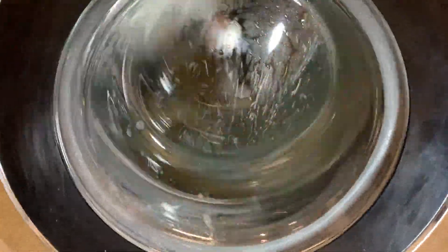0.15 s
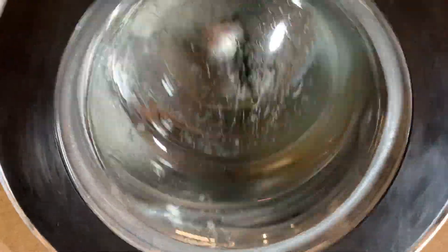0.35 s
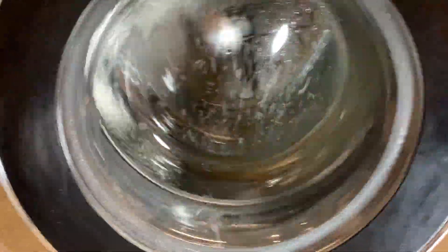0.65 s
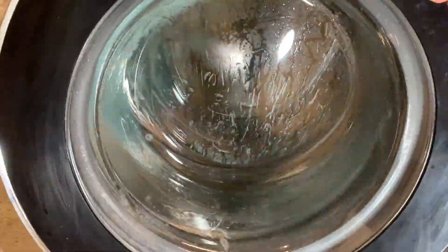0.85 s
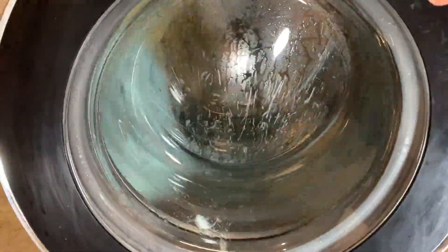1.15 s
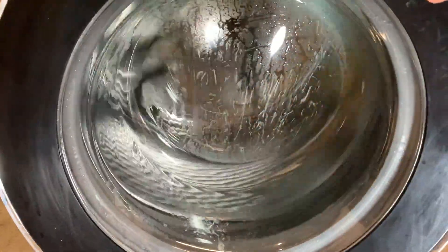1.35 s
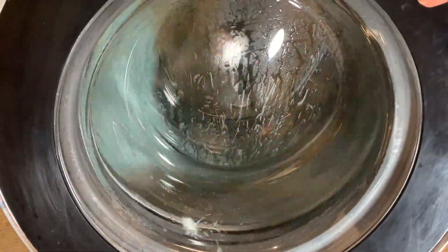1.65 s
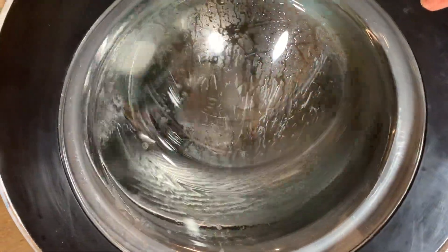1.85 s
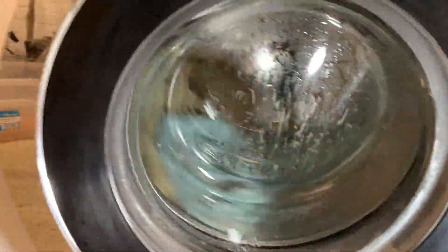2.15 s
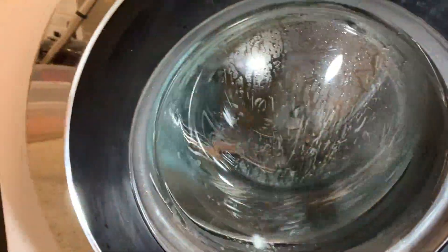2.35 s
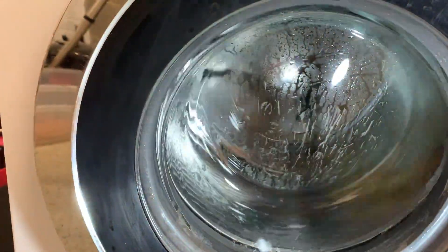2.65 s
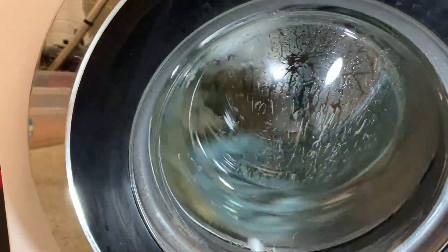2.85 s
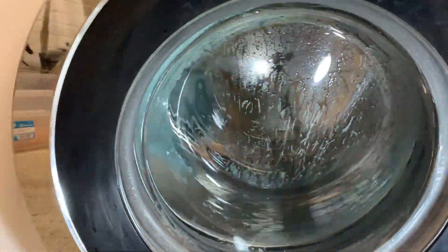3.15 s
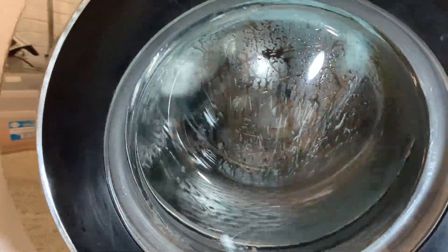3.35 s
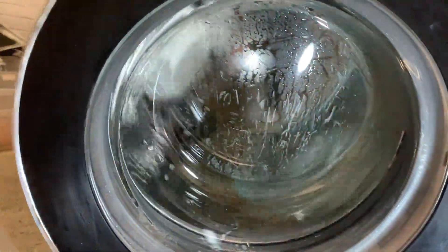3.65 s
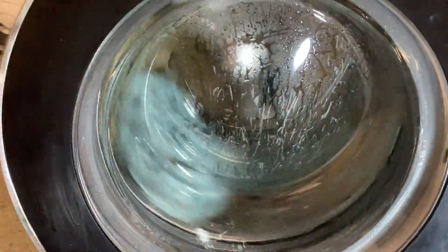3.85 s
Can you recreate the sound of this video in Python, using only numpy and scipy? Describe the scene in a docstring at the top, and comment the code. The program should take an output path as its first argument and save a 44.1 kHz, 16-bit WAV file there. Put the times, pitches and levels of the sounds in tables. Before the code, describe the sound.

Unbalanced washing machine drum bangs and clatters hard, then weakens to faint thuds as the spin dies

```python
"""Heavy knocks and clatter of an unbalanced washing machine drum against its cabinet, heard close in stereo.
Each blow starts banded noise (sheet metal) and rings decaying sines (panel modes); some modes clank out.
Lumpy low noise is the cabinet rumbling on the floor; all of it weakens as the spin winds down
into a quiet room of shaped noise and wavering hum."""
import sys
import numpy as np
from scipy import signal
from scipy.fft import rfft, irfft
from scipy.io import wavfile
from scipy.ndimage import uniform_filter1d

SR = 44100
rng = np.random.default_rng(int(sys.argv[2]) if len(sys.argv) > 2 else 0)


def generate_wav(sig):
    """Save sig (samples, or channels by samples) to the path in sys.argv[1] as 16-bit PCM at SR."""
    pcm = np.round(np.clip(np.atleast_2d(sig).T, -1, 1) * 32767).astype(np.int16)
    wavfile.write(sys.argv[1], SR, pcm)


N = 176400
HZ = np.fft.rfftfreq(N, 1 / SR)

# drum blows: start_s, treble_db, upper_middle_db, middle_db, hollow_db, thud_db (relative levels),
# length_factor (scales the clatter decay, limited on use)
BLOWS = [(0.0024, -42.5, -32, -23, -27, -6.5, 1.14), (0.0255, -15.5, -29.5, -10.5, -15.5, -16.5, 0.4),
         (0.0612, -23, -25.5, -20, -32.5, -22.5, 0.75), (0.1425, -30.5, -37, -21, -26, -11.5, 2.5),
         (0.11, -42.5, -33.5, -30, -22.5, -15, 2.4), (0.2292, -13.5, -22, -12, -16, -11, 1.1),
         (0.2595, -33, -23, -15, -7.5, -8, 1.2), (0.322, -23, -25, -30, -20, -8, 1.56),
         (0.3789, -30.5, -34.5, -28.5, -13, -8.5, 0.86), (0.406, -41, -34, -18, -26, -7.5, 0.78),
         (0.4523, -12, -20, -11.5, -10.5, -12, 0.9), (0.4837, -21, -19, -15, -7, -8, 1.3),
         (0.5484, -18.5, -18, -14.5, -12.5, -10, 1.7), (0.5773, -17, -25.5, -25, -16.5, -13, 1.25),
         (0.6552, -53, -30.5, -27, -10.5, -8.5, 1.4), (0.689, -59, -55.5, -11.5, -17, -20.5, 2.9),
         (0.7036, -17, -21.5, -14, -22, -9, 1.74), (0.7502, -32, -24, -23.5, -16.5, -8.5, 3.2),
         (0.821, -17, -21, -18.5, -11.5, -7.5, 1.3), (0.8597, -30, -46.5, -33, -11.5, -10, 0.47),
         (0.92, -47.5, -45, -30, -25.5, -22.5, 1.9), (0.982, -40.5, -37, -14.5, -22, -4.5, 0.31),
         (1.0034, -12.5, -20.5, -11.5, -13, -13.5, 0.55), (1.0423, -26, -25.5, -15, -6, -11.5, 0.64),
         (1.0643, -23.5, -21, -15, -11, -10, 1.64), (1.1089, -20.5, -22, -17.5, -15.5, -9.5, 1.17),
         (1.238, -35.5, -58, -49, -33, -17.5, 1.1), (1.2772, -37.5, -42, -26.5, -26, -8.5, 0.61),
         (1.3096, -38.5, -38.5, -24, -32, -16.5, 0.54), (1.3289, -52, -30, -29, -18.5, -25, 1.03),
         (1.395, -33.5, -31.5, -24.5, -22.5, -14.5, 2.5), (1.421, -25.5, -23.5, -16, -15, -15.5, 1.01),
         (1.613, -45, -46, -41.5, -34, -28, 2.2), (1.6417, -25.5, -41.5, -41, -24, -19.5, 1.1),
         (1.6605, -32.5, -31.5, -34, -34, -18.5, 1.25), (1.7598, -41, -55, -36, -50, -50, 0.61),
         (1.8326, -34, -44, -38, -34, -24.5, 0.91), (1.860, -27.5, -26.5, -20, -14.5, -11.5, 1.07),
         (1.8976, -31, -27.5, -39, -10, -28.5, 0.56), (1.9329, -32.5, -39, -38, -21.5, -30.5, 0.49),
         (1.9687, -45, -42, -38, -27, -18, 1.24), (2.0654, -47.5, -39, -45.5, -38, -27, 1.6),
         (2.1019, -32.5, -40, -37, -28.5, -23.5, 1.2), (2.1448, -44, -34.5, -30.5, -21.5, -22, 1.41),
         (2.2764, -41.5, -44, -41, -24, -21, 0.47), (2.299, -51, -47, -36.5, -36.5, -23.5, 1.67),
         (2.36, -34, -41.5, -50, -57, -51, 0.7), (2.4615, -43.5, -41, -37, -40, -29.5, 3.1),
         (2.5168, -51, -53, -38.5, -35, -32, 0.6), (2.5431, -31, -35, -34.5, -27.5, -36, 0.85),
         (2.589, -73, -50, -44.5, -31, -36.5, 1.53), (2.8101, -75, -106, -59.5, -50, -55, 0.74),
         (2.908, -58, -48, -46.5, -44, -39, 1.14), (3.046, -78.5, -55.5, -45, -39, -31.5, 1.08),
         (3.116, -83, -60, -56, -48, -47, 0.5), (3.292, -78.5, -57.5, -43.5, -39, -33.5, 1.02),
         (3.352, -75, -74, -54.5, -40, -39, 1.57), (3.701, -75, -71, -55, -62, -45, 0.54)]
# likeness of the two ports: freq_hz, likeness (0..1)
PORT_LIKENESS = [(60, 0.98), (290, 0.96), (640, 0.23), (1400, 0.091), (3100, 0.13), (6500, 0.27), (9000, 1),
                 (15000, 0.48)]


def amp(db):
    """Amplitude ratio of a level in dB."""
    return 10 ** (np.asarray(db) / 20)


def evened(x):
    """Signal scaled to unit RMS over all its channels."""
    return x / np.sqrt(np.mean(x ** 2) + 1e-20)


def read(points, hz, axis=1):
    """One table column interpolated over log frequency."""
    table = np.array(points)
    return np.interp(np.log(hz + 1), np.log(table[:, 0] + 1), table[:, axis])


def port_likeness(hz):
    """Share of sound common to both ports at a frequency."""
    return np.clip(read(PORT_LIKENESS, hz), 0, 1)


def port_phase(hz):
    """Phase in radians between the ports whose cosine is their likeness."""
    return np.arccos(port_likeness(hz))


def noise(tone):
    """Spectra of shaped noise at two partly alike ports; the left hears the treble later."""
    lag_s, lag_from_hz = 0.000191, 625
    a, b = rfft(rng.standard_normal((2, N)))
    alike = port_likeness(HZ)
    late = np.exp(-2j * np.pi * np.maximum(HZ - lag_from_hz, 0) * lag_s)
    left = a * late
    right = alike * a + np.sqrt(1 - alike ** 2) * b
    return amp(read(tone, HZ)) * np.array([left, right])


def wobble(seconds):
    """Random curve of unit RMS, smoothed twice over the given time."""
    size = max(int(seconds * SR), 2)
    once = uniform_filter1d(rng.standard_normal(N), size)
    return evened(uniform_filter1d(once, size))


def ring(hz, db, t60_s, phase):
    """One mode: a sine that swells over two cycles and decays exponentially."""
    t = np.arange(SR // 2) / SR
    envelope = amp(db - 60 * t / t60_s) * np.minimum(t * hz / 2, 1)
    return envelope * np.sin(2 * np.pi * hz * t + phase)


def hums(table):
    """Wavering tones: noise through narrow resonances, independent of port."""
    total = np.zeros(N)
    for hz, width_hz, db in table:
        resonance = 1 + (2 * (HZ - hz) / width_hz) ** 2
        tone = irfft(rfft(rng.standard_normal(N)) / resonance, N)
        total += amp(db) * evened(tone)
    return total


def blow_db(row, hz):
    """Level of one blow at a frequency, read between its five bands."""
    # centres of the blow columns, treble to thud: freq_hz
    column_hz = [8000, 3000, 900, 290, 90]
    return np.interp(np.log(hz), np.log(column_hz[::-1]), row[5:0:-1])


def blow_shape(row, hz, onset, rise_s, t60_s, t):
    """Amplitude of one blow in one band: a crack, a linear rise and an ever faster fall."""
    dull_from_db, soften_per_db = 24.5, 0.16
    bend = 1.073  # above 1: the fall steepens
    # dull blows, whose treble lies far below their middle, swell in more slowly
    softness = 1 + soften_per_db * max(row[3] - row[1] - dull_from_db, 0)
    rise = np.minimum(t / (rise_s * softness), 1)
    length_s = t60_s * np.clip(row[6], .2, 1.9)
    return onset * rise * amp(blow_db(row, hz) - 60 * (t / length_s) ** bend)


def clatter():
    """Sheet metal: each blow excites noise in 28 bands, each with its own rise and decay."""
    # band response: freq_hz, rise_s, t60_s
    ringing = [(51.26, 0.014, .5), (150, 0.0059, 0.4), (374.7, 0.011, 0.23), (1490, 0.0058, 0.29),
               (4650, 0.0028, 0.34), (13700, .001, 0.19)]
    # blow to band level: freq_hz, relative_db
    trim = [(60, -2), (150, 1), (350, -3), (1000, -0.5), (2500, -2), (5000, -9), (9000, -7.5),
            (15000, -6.5)]
    crack_db, crack_s = 9, 0.0023  # brighter first instant
    patch_db, patch_s = 3, 0.022  # each band flickers by itself
    ripple_db, ripple_hz = 1, 27.27  # countless small plate modes comb the spectrum
    ripple = wobble(ripple_hz * N / SR ** 2)[:len(HZ)]  # smoothed over frequency bins
    spectrum = noise(trim) * amp(ripple_db * ripple)
    t = np.arange(SR // 2) / SR
    centres_hz = np.geomspace(45, 15000, num=28)
    out = np.zeros((2, N))
    for k, hz in enumerate(centres_hz):
        share = np.interp(np.log(HZ + 1), np.log(centres_hz), np.arange(len(centres_hz)) == k)
        treble_weight = np.sqrt(k / len(centres_hz))
        onset = amp(crack_db * treble_weight * np.exp(-t / crack_s))
        rise_s, t60_s = read(ringing, hz), read(ringing, hz, axis=2)
        power = np.zeros(N)
        for row in BLOWS:
            shape = blow_shape(row, hz, onset, rise_s, t60_s, t)
            part = power[round(row[0] * SR):][:len(t)]
            part += shape[:len(part)] ** 2
        band = evened(irfft(spectrum * share, N))
        level_db = read(trim, hz) - 11.0 + patch_db * treble_weight * wobble(patch_s)
        out += band * np.sqrt(power) * amp(level_db)
    return out


def panels():
    """Each blow and its two bounces land elsewhere and ring the panel modes by different amounts."""
    # panel modes: freq_hz, relative_db, t60_s
    modes = [(57.84, 3, 0.26), (88, 4, 0.19), (149.5, -3, 0.12), (254.1, -8.5, 0.17), (414.5, -11.5, .1),
             (300, -5.5, .2), (681.3, -4.5, 0.16), (782, -6.5, 0.099), (884.5, -7, 0.17),
             (1250, -10, 0.043), (1660, -9.5, 0.039), (2316, -8.5, 0.19), (2593, -6.5, 0.094)]
    panel_db, strike_spread_db = -4, 3.5
    bounce_s, bounce_db = .07, -4  # longest wait, level against the blow
    detune = .035  # flexing panels: each strike finds a mode lower, true or higher
    draws = (len(BLOWS), 3, len(modes))
    sizes, signs = rng.standard_normal(draws), rng.choice([-1, 1], draws)
    flexes = rng.integers(0, 3, draws)
    waits_s = bounce_s * rng.random((len(BLOWS), 3)) * [0, 1, 1]
    out = np.zeros((2, N))
    for k, (hz, db, t60_s) in enumerate(modes):
        strikes = np.zeros((3, N))  # one train per detuning
        for i, row in enumerate(BLOWS):
            spread_db = strike_spread_db * np.clip(sizes[i, :, k], -2, 1)
            level_db = blow_db(row, hz) + spread_db + bounce_db * (waits_s[i] > 0)
            at = ((row[0] + waits_s[i]) * SR).astype(int)
            strikes[flexes[i, :, k], at] = amp(level_db) * signs[i, :, k]
        phase = np.arange(2)[:, None] * port_phase(hz)
        for flex, train in enumerate(strikes):
            mode = ring(hz * (1 + detune * (flex - 1)), db, t60_s, phase)
            out += signal.oaconvolve(train[None], mode, axes=1)[:, :N]
    return amp(panel_db) * out


def clanks():
    """Clanks and hollow knocks: single modes that stand out, each roughened by a weaker neighbour."""
    # outstanding modes: start_s, freq_hz, level_db, t60_s (limited on use)
    standouts = [(.045, 746, -11, 0.1), (.357, 110, -20, 0.034), (.456, 1035, -10, 0.048),
                 (.486, 657, -13, 0.12), (.493, 102, -1.5, .2), (.572, 85.5, -2.5, 0.1),
                 (.671, 130, -1, .05), (.707, 970, -5.5, 0.026), (1.005, 1034, -3, 0.055),
                 (1.05, 94, 1, 0.34), (1.063, 644, -13, 0.1), (1.125, 88, -1, 0.37),
                 (1.326, 786, -15.5, 0.051), (1.408, 96.3, -2.5, 0.38), (1.418, 285.6, -5.5, 0.11),
                 (1.424, 424, -11.5, 0.059), (1.424, 1023, -15, 0.038), (1.446, 330.3, -14, 0.17),
                 (1.456, 650, -20, 0.2), (1.864, 179, -0.5, 0.071), (1.878, 484, -14.5, 0.075),
                 (1.886, 109.6, 4, 0.075), (1.925, 130, 0.5, 0.085), (2.104, 1250, -31, 0.052),
                 (2.155, 163, -9.5, 0.18), (2.237, 1920, -33, 0.038), (2.301, 1250, -27, 0.035),
                 (2.309, 88, -15, 0.62), (2.475, 300, -29, 0.21), (2.484, 84.3, -22, .12),
                 (2.569, 150, -22, 0.12), (2.588, 300, -28, 0.16), (2.812, 291, -35.5, 0.2),
                 (2.927, 308.6, -35, 0.31), (3.055, 289, -31, 0.17), (3.115, 805, -44, .08),
                 (3.309, 303.5, -31.5, 0.31), (3.355, 300, -34.5, 0.13), (3.7, 805, -52.5, 0.12),
                 (3.787, 3700, -67, 0.052)]
    partner_share, partner_db = .12, -7.5  # neighbour offset as a share of frequency, relative level
    longest_s, longest_cycles = .28, 260
    sides = rng.choice([-1, 1], len(standouts))  # neighbour below or above
    out = np.zeros((2, N + SR))
    for (start_s, hz, db, t60_s), side in zip(standouts, sides):
        t60_s = min(t60_s, longest_s, longest_cycles / hz)
        phase = np.arange(2)[:, None] * port_phase(hz)
        main = ring(hz, db, t60_s, phase)
        partner = ring(hz * (1 + side * partner_share), db + partner_db, t60_s, -phase)
        out[:, round(start_s * SR):][:, :SR // 2] += main + partner
    return out[:, :N]


def rumble():
    """The cabinet shakes on the floor: lumpy low noise plus two low resonances, fading together."""
    # fade: time_s, gain_db
    fade = [(0.0, -10.5), (1.09, -20), (4.0, -55)]
    # noise spectrum: freq_hz, relative_db_per_hz
    tone = [(12, -52.5), (20, -7), (43, 3.5), (85, 0), (135, -7.5), (172, -6.5), (316, -7.5), (540, -27.5),
            (780, -53.5)]
    # cabinet resonances: freq_hz, width_hz, relative_db
    shudder = [(55, 2.7, -5.5), (178, 19, -12)]
    noise_db, lumps_db, lumps_s = -7.5, 4, 0.0075
    time_s, gain_db = np.transpose(fade)
    lumps = amp(noise_db + lumps_db * wobble(lumps_s)) * evened(irfft(noise(tone), N))
    return amp(np.interp(np.arange(N) / SR, time_s, gain_db)) * (lumps + hums(shudder))


def room():
    """Quiet room: steady shaped noise with a wavering low hum."""
    # noise spectrum: freq_hz, relative_db_per_hz
    tone = [(12, -53), (20, -22.5), (32, -5.5), (58, -2), (76, -12), (171, -19.5), (207, -27), (478, -31),
            (788, -29), (1230, -31.5), (1770, -51.5), (3750, -56), (15500, -61)]
    # hum: freq_hz, width_hz, level_db
    hum = [(50, 10, -51), (158.2, 6.4, -62.5)]
    noise_db = -52.5
    return amp(noise_db) * evened(irfft(noise(tone), N)) + hums(hum)


def scene():
    """Sum of all sources at the two ports."""
    return clatter() + panels() + clanks() + rumble() + room()


def record(dry):
    """Bass cut and port balance, soft overload, band limit."""
    # port balance: freq_hz, left_minus_right_db
    balance = [(60, 1.5), (180, 0), (550, 1.5), (1650, 2.5), (4970, -1), (15000, 0.5)]
    low_cut_hz, ceiling, edge_hz = 50.2, .99, 15900
    hz = np.fft.rfftfreq(2 * N, 1 / SR)
    low_cut = (1j * hz / (low_cut_hz + 1j * hz)) ** 2
    tilt = amp(read(balance, hz) * np.array([[.5], [-.5]])) * low_cut
    mirrored = np.hstack([dry, dry[:, ::-1]])  # no jump where the filter wraps round
    x = irfft(rfft(mirrored) * tilt)[:, :N + 512]
    x = x / (1 + (x / ceiling) ** 4) ** (1 / 4)
    low_pass = signal.firwin(511, edge_hz, window=("kaiser", 9), fs=SR)
    return signal.oaconvolve(x, low_pass[None], "same")[:, :N]


dry = scene()
out = record(dry)
generate_wav(out)
```